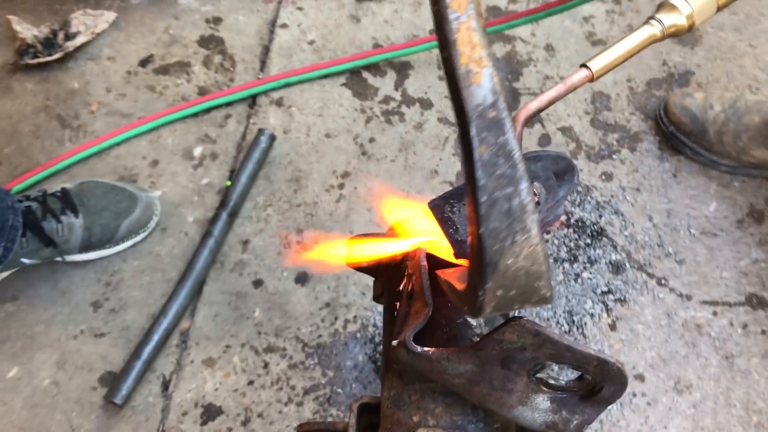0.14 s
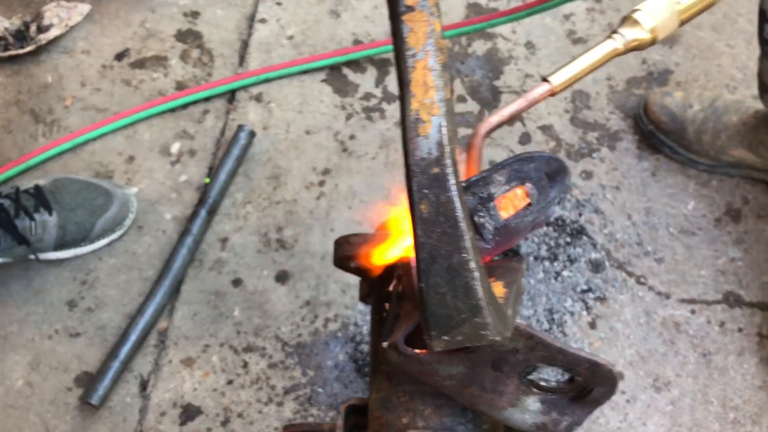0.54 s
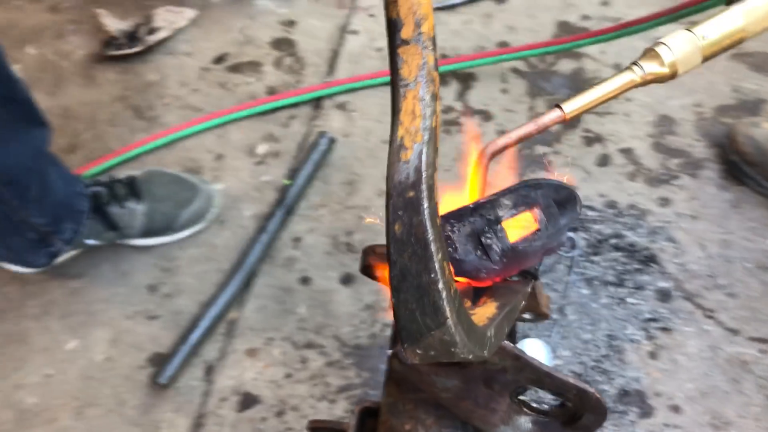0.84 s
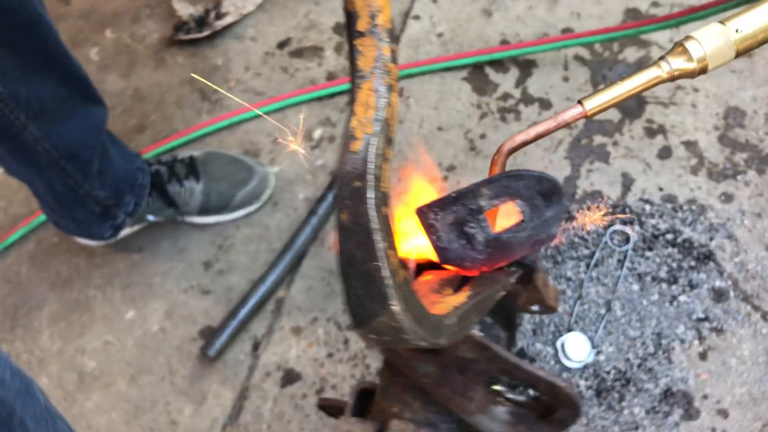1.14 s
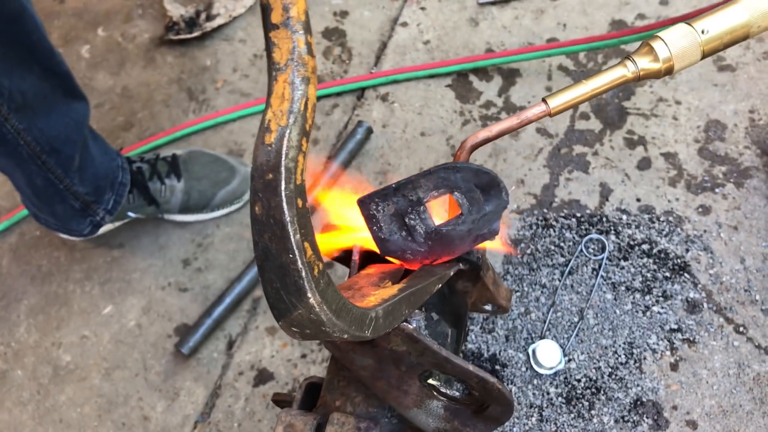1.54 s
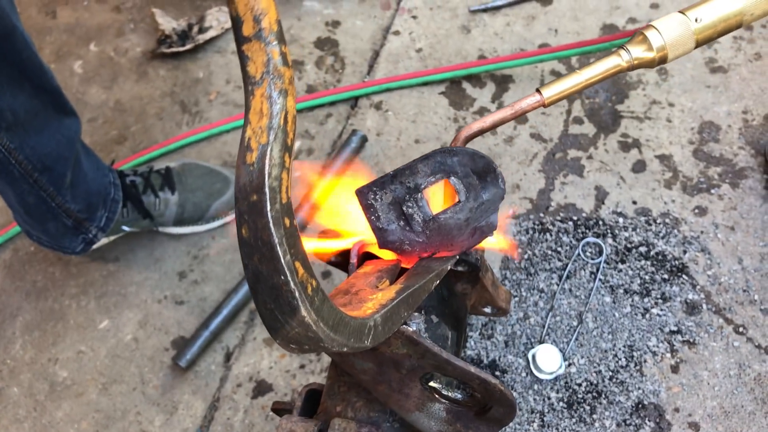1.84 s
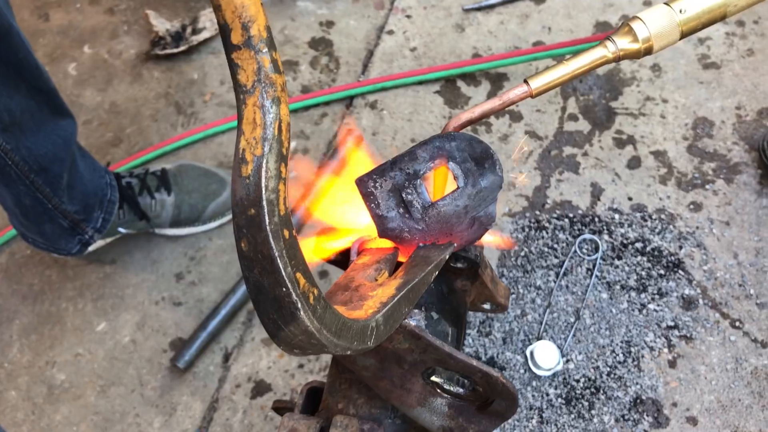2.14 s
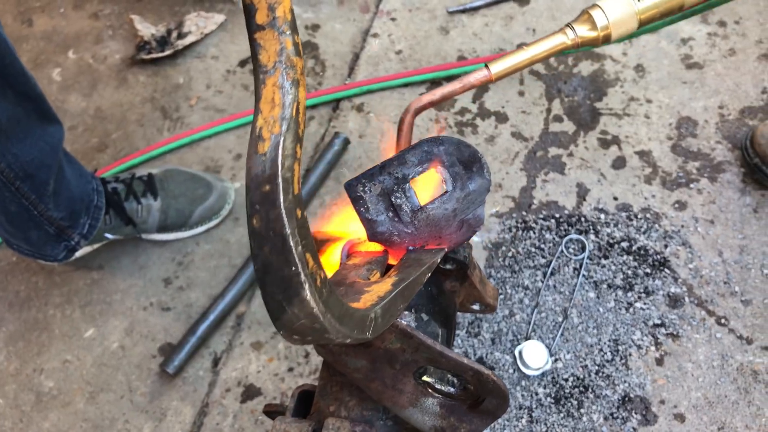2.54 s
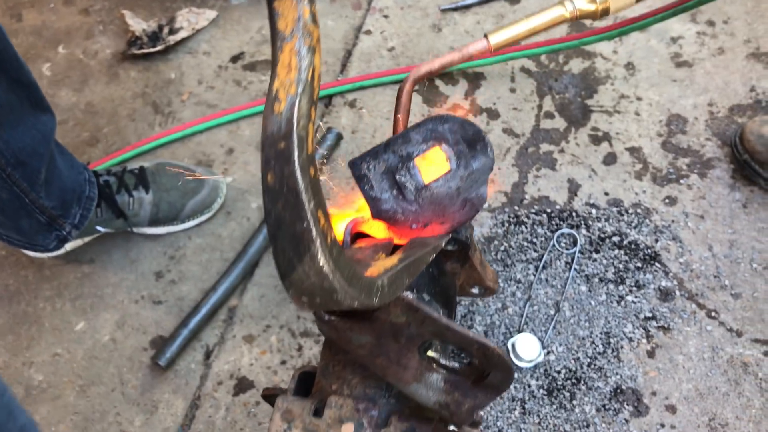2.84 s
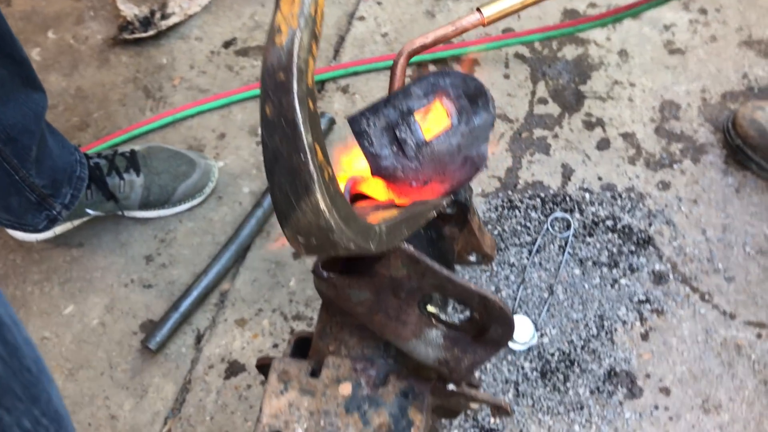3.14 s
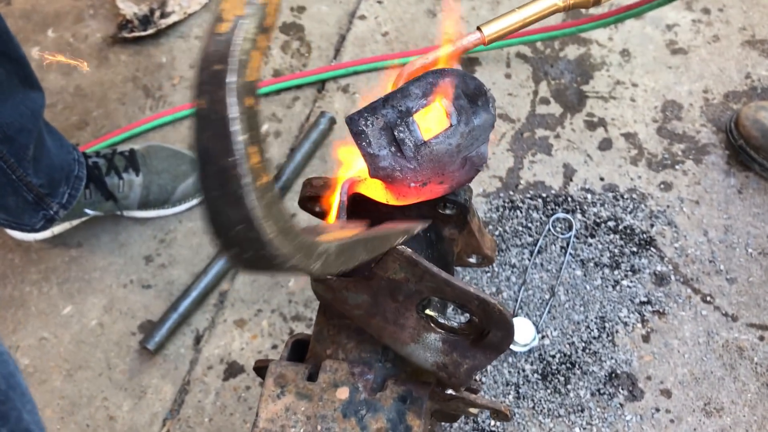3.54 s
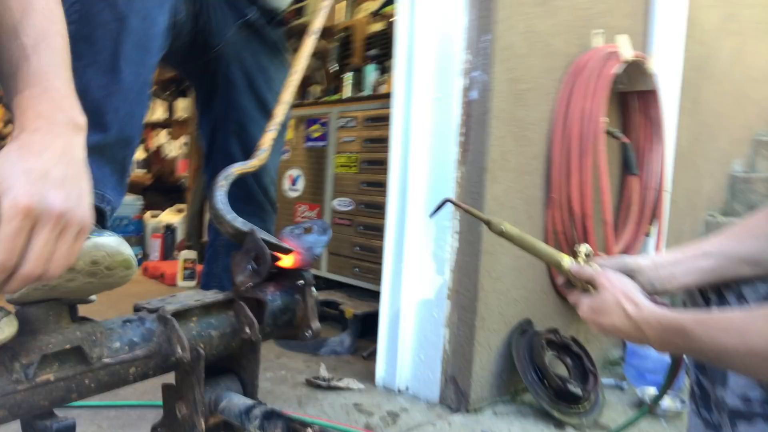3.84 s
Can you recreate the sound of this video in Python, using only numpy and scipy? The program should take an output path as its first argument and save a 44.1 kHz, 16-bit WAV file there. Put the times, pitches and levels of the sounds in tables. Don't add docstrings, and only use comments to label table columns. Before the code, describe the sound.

A gas torch starts with a soft burn and flutter, then hisses sharply on steel at close range, wavering and puffing; near the end a bar knocks a vice three times, then abrupt quiet.

```python
import sys
import numpy as np
from scipy import signal
from scipy.fft import rfft, irfft
from scipy.io import wavfile
from scipy.ndimage import uniform_filter1d, map_coordinates

SR = 44100
rng = np.random.default_rng(int(sys.argv[2]) if len(sys.argv) > 2 else 0)


def field_ratio(decibels):
    return 10 ** (np.asarray(decibels, dtype=float) / 20)


def put_to_file(sound):
    columns = np.atleast_2d(sound).T
    safe = np.clip(columns, -1, 1)
    whole_steps = np.round(safe * 32767)
    wavfile.write(sys.argv[1], SR, whole_steps.astype(np.int16))


N = 176400
T = np.arange(N) / SR
HZ = np.maximum(np.arange(N // 2 + 1) * SR / N, 1)

# f/Hz, level/dB
BURN_COLOUR = [(30, 1), (90, -2.5), (300, -11), (830, -15.5), (910, -0.5), (1500, -1), (2100, -6),
               (6000, -16), (9000, -42.5)]
# t/s, level/dB
ROAR_LEVEL = [(0, -54), (.05, -38.5), (.14, -42), (.19, -57), (.6, -59.5), (.65, -44), (.79, -36.5),
              (.87, -54), (1.6, -54.5), (1.64, -43), (1.83, -44.5), (1.91, -64.5), (2.1, -61.5),
              (2.17, -46.5), (2.3, -56), (2.7, -41.5), (3.22, -40.5), (3.35, -55)]
# f/Hz, level/dB
ROAR_TONE = [(30, -14), (80, -6), (250, 0), (700, -2.5), (1200, 0), (1550, -5), (1800, -7), (6000, -31.5)]
# t/s, peak level/dB, f/Hz
GAS_PUFFS = [
    (.11, -35, 330),
    (1.226, -39, 550),
    (1.395, -33.5, 310),
    (1.501, -39, 240),
    (3.437, -40, 400),
    (1.685, -36, 490),
    (1.81, -35, 200),
    (2.133, -39, 370),
    (2.166, -37, 390),
]
# t/s, level/dB
NOZZLE_LEVEL = [(0, -56), (.1, -54.5), (.17, -36), (.63, -40.5), (.86, -31.5), (1.01, -39.5), (1.1, -32.5),
                (1.27, -47), (1.38, -40), (1.46, -41), (1.7, -49), (1.87, -35), (2.0, -39.5), (2.3, -33.5),
                (2.47, -41), (2.9, -33), (3.22, -38.5), (3.9, -37.5)]
# f/Hz, level/dB
NOZZLE_TONE = [(4000, -30), (7000, 2.5), (10500, 2), (11300, 10), (13000, 10.5), (14500, 9), (16000, 4.5)]
# t/s, peak level/dB, decay/s
NOZZLE_SPITS = [(.7905, -24, .004), (.802, -32, .008), (.2, -38, .05), (.3, -38, .04), (.9, -36, .06),
                (.06, -46, .06), (1.9, -38, .05), (1.7, -40, .04), (2.13, -34, .06), (2.37, -35, .02),
                (2.59, -34, .03), (2.7, -36, .05), (3.09, -35, .03), (1.05, -36, .03), (1.44, -30, .04),
                (1.56, -35, .05), (1.81, -35, .04), (3.34, -35, .02), (3.42, -34, .02), (3.64, -30, .03),
                (3.74, -35, .02)]
# t/s, level/dB, brightness/(dB per octave), ring of the hole/dB
JET_PATH = [(0, -53.5, 2.5, -15), (.13, -47, -5.5, -9.5), (.18, -33, -2, -2.5), (.6, -32.5, -2, -12.5),
            (.65, -45.5, -7.5, -10), (.88, -33, -1.5, -4), (1.17, -37, -2, -10), (1.26, -43, -5, -7),
            (1.39, -47, -7.5, -6), (1.45, -36, -0.5, -16), (1.65, -44.5, -4, -10), (1.78, -40, -1.5, -3.5),
            (1.9, -30.5, 0.5, -4.5), (2.2, -31, 0.5, 0.5), (2.35, -34, 0.5, -7), (2.95, -29.5, -1.5, -5),
            (3.43, -38, -5.5, -4), (3.75, -33, -1, -9)]
# f/Hz, level/dB
JET_TONE = [(900, -25.5), (1900, -12), (3500, -3.5), (5800, 0), (7700, -3), (9400, -5.5), (10500, -4.5),
            (17000, -23)]
# f/Hz, level/dB
HOLE_TONE = [(6500, -29), (7900, -1.5), (8800, 5.5), (9600, 4.5), (10300, -9), (11000, -25)]
# middle t/s, length/s, then changes of jet/dB, ring of the hole/dB, roar/dB
HAND_WAVERS = [(0.05, 0.057, 3.5, -3, 1), (0.493, 0.28, 0.5, -11, -1), (0.71, 0.21, -0.5, 8, -0.5),
               (1.012, .1, -2.5, 0, 2), (1.296, 0.25, -3, -2, 3), (1.457, 0.16, 1.5, -3, 7),
               (1.87, 0.14, 1, -7, 0), (2.152, 0.39, 2, -2, 0.5), (2.47, 0.23, 0.5, -7, 4.5),
               (2.576, 0.18, 2, -1.5, 1), (2.765, 0.16, -1.4, 8, 2), (2.95, 0.41, -0.5, 0.5, 3),
               (3.155, 0.1, 2.5, 3, 0.5), (3.31, 0.21, 1.5, -5.5, -2), (3.492, .2, -5, 4, 2),
               (3.619, 0.12, 0.5, 10, -4), (3.773, 0.11, 0.5, 8, -4), (3.86, 0.2, 2, -10, -3)]
# f/Hz, level/dB
FLOOR_ECHO = [(1350, 0), (1490, 2), (1545, -5), (1780, -5.5), (1900, -1), (1985, -7), (2040, 0)]
# middle t/s, length/s, level/dB, f/Hz
FLAME_THRUMS = [
    (1.075, 0.19, -54, 75),
    (1.408, 0.088, -52.5, 70),
    (2.294, 0.42, -55.5, 85),
    (3.54, 0.32, -54, 90),
    (3.423, .07, -52.5, 139.7),
    (3.678, 0.06, -45.5, 110),
    (3.83, 0.11, -48, 120),
]
# t/s, peak level/dB, crack level/dB
BAR_KNOCKS = [
    [(3.4715, -18.5, -12), (3.476, -24, -6)],
    [(3.502, -25.5, -11), (3.508, -32, -9), (3.518, -30, -6), (3.532, -35, -11)],
    [(3.651, -14.5, -5), (3.6586, -18, -8), (3.675, -27, -6)],
    [(3.7995, -14.5, -8), (3.832, -21, -6), (3.861, -30, -14), (3.898, -27.5, -9)],
    [(3.803, -21.5, -6), (3.8085, -24.5, -7), (3.842, -34, -4), (3.872, -28, -10)],
]
# f/Hz, time to fall 60 dB/s, level/dB at each of five contact points
METAL_MODES = [(261, 0.042, -34, -1, -4.5, -20, -17), (354, 0.092, -30, -22, -9.5, -31, -25),
               (510, 0.13, -23, -12, -15.5, -20, -9), (693, .05, -28, -12, -1.5, -28, -25),
               (774, 0.021, -27, -12, 2, -27, -17), (904, 0.12, -22, -8, -2, -12, -1.5),
               (1255, 0.025, -25, -17, -3.5, 2, -4), (1490, 0.12, -19, -23, -8, -18, -12),
               (1617, 0.053, -22, -12, 0.5, -25, -22), (2104, .12, -8, -3, -11, -10, -12),
               (2440, 0.022, -11, -16, -13, 2.5, -14), (2780, .08, -12, -16, -15.5, -7, -8),
               (1117, 0.047, 0.5, 4, -10, -4, -11), (1805, 0.5, -28, -12.5, -23, -37, -28),
             (3285, 0.12, -2, -8, -14, -14, 1.5), (5556, .07, -7, -20, -30, -25, -20),
             (6170, .045, -7, -25, -30, -11, -7), (6500, 0.062, -3, -25, -30, -12, -10)]
# middle t/s, length/s, level/dB
BAR_SCRAPES = [
    (3.53, 0.074, -43),
    (3.863, 0.09, -42),
]
# f/Hz, level/dB
CRACK_TONE = [(250, -3.5), (900, 3.5), (3500, 7.5), (8000, -16)]
DRAG_TONE = [(120, -3), (280, 0.5), (1200, 0.5), (2500, -17)]
# f/Hz, level/dB
YARD_TONE = [(24, -28), (40, 7), (965, -12), (1150, -11), (1520, -4.5), (2380, -22.5), (5440, -27),
             (13100, -34), (16000, -36)]
# middle t/s, low f/Hz, high f/Hz
SIDE_PATCHES = [(.28, 12300, 14500), (.40, 4200, 5300), (.40, 7500, 9100), (.41, 11700, 14000),
                (.42, 5600, 7000), (.49, 8900, 11100), (2.0, 5100, 6400), (2.625, 4200, 5300),
                (2.625, 6800, 8400), (3.045, 7500, 9100), (3.045, 9600, 11200), (3.045, 13000, 15700)]
BASS, TREBLE, TOP = (4.5, 13.2), (9.5, 14.4), (11.83, 14.4)


def unit(x):
    return x / np.sqrt(np.mean(x ** 2))


def curve(rows, col=1):
    rows = np.array(rows, float)
    return np.interp(T, rows[:, 0], rows[:, col])


def colour(x, points):
    hz, db = np.array(points, float).T
    return rfft(x) * field_ratio(np.interp(np.log(HZ), np.log(hz), db))


def coloured_noise(points):
    return unit(irfft(colour(rng.standard_normal(N), points), N))


def swell_shape(middle_s, length_s):
    return np.cos(np.pi / 2 * np.clip(2 * (T - middle_s) / length_s, -1, 1))


def high_pass(x, order, hz):
    return signal.sosfilt(signal.butter(N=order, Wn=hz, btype="high", fs=SR, output="sos"), x)


def hand_waver(col):
    total_db = 0
    for row in HAND_WAVERS:
        away = 2 * (T - row[0]) / row[1]
        total_db = total_db + row[col] * np.maximum(1 - away ** 2, 0) ** 2
    return total_db


def walk(rate):
    k = 16
    x = np.repeat(rng.standard_normal(int(N / SR * rate) + 3), k)
    x = unit(uniform_filter1d(uniform_filter1d(x, k), k))
    return np.interp(T * rate * k, np.arange(len(x)), x)


def turbulence(points, eddy_db, eddy_rate, gust_db, flicker_db, tilt_db=0, octaves=BASS):
    eddies = rng.standard_normal(N) * field_ratio(eddy_db * walk(eddy_rate))
    spec = colour(eddies, points)
    pitch = np.log2(HZ)
    gust, flicker, out = walk(9.09), walk(5.9), 0
    for centre in np.arange(*octaves, 1 / 3):
        flicker = 0.85 * flicker + 0.91 * walk(6.18)
        band = irfft(spec * np.clip(1 - 3 * abs(pitch - centre), 0, 1), N)
        tilt = tilt_db * (centre - np.log2(6000))
        out = out + band * field_ratio(gust_db * gust + flicker_db * flicker + tilt)
    return out / np.sqrt(np.mean(irfft(spec, N) ** 2))


def steady_burn():
    return turbulence(BURN_COLOUR, 2.1, 200, 0.87, 0.74, octaves=BASS) * field_ratio(-48)


def flame_roar():
    roar = turbulence(ROAR_TONE, 1.95, 70, 0.75, 0.53, octaves=BASS)
    return roar * field_ratio(curve(ROAR_LEVEL) + hand_waver(col=4) + 3.5)


def gas_puffs():
    out, rasp = 0, coloured_noise(ROAR_TONE)
    for start, db, hz in GAS_PUFFS:
        age = np.maximum(T - start, 0)
        fade = np.exp(-age / 0.0052) * (T > start)
        out = out + field_ratio(db) * fade * (np.sin(2 * np.pi * hz * age) + 0.85 * rasp)
    return out


def nozzle_sizzle():
    level = field_ratio(curve(NOZZLE_LEVEL) + 0.5)
    for peak, db, length in NOZZLE_SPITS:
        rise = np.clip((T - peak) / (0.64 * length) + 1, 0, 1)
        level = level + field_ratio(db) * rise * np.exp(-np.maximum(T - peak, 0) / length)
    return turbulence(NOZZLE_TONE, 2.0, 1500, 0.94, 1.4, octaves=TOP) * level


def jet_hiss(jet_db):
    brightness = curve(JET_PATH, col=2)
    return turbulence(JET_TONE, 1.36, 1500, 0.94, 0.69, brightness, octaves=TREBLE) * field_ratio(jet_db + 2.0)


def hole_ring(jet_db):
    ring_db = curve(JET_PATH, col=3) + hand_waver(col=3)
    return turbulence(HOLE_TONE, 4.1, 1500, 0.75, 0.86, octaves=TOP) * field_ratio(jet_db + ring_db)


def torch():
    jet_db = curve(JET_PATH) + hand_waver(col=2)
    return jet_hiss(jet_db) + hole_ring(jet_db) + nozzle_sizzle() + flame_roar() + steady_burn()


def close_echoes(x):
    age = np.arange(2000) / SR
    cloud = rng.standard_normal(len(age)) * np.exp(-age / 0.012)
    bright = high_pass(x, 2, 2600)
    cloud = signal.fftconvolve(bright, cloud / np.sqrt(np.sum(cloud ** 2)))[:N]
    delay_s = 0.001085 + 0.000305 * walk(3)
    moving = map_coordinates(bright, [(T - delay_s) * SR], mode="mirror")
    block_ring = field_ratio(3.5 * np.exp(-((HZ - 2486) / 16.7) ** 2))
    mix = x + field_ratio(-6) * cloud + field_ratio(-17) * moving
    return 0.91 * irfft(colour(mix, FLOOR_ECHO) * block_ring, N)


def thrums():
    drift = np.cumsum(walk(14)) / SR
    swell, out = field_ratio(4.6 * walk(44.7)), 0
    for middle, length, db, hz in FLAME_THRUMS:
        tone = np.sin(2 * np.pi * hz * (T + 0.069 * drift))
        out = out + field_ratio(db) * swell * swell_shape(middle, length) * tone
    return out


def metal_ring(point, age):
    ring = 0
    for k, mode in enumerate(METAL_MODES):
        fade = np.exp(-np.log(1000) * age / mode[1])
        ring = ring + (-1) ** k * field_ratio(mode[2 + point]) * fade * np.sin(2 * np.pi * mode[0] * age)
    return ring


def knocks():
    out, age = np.zeros(N), T[:SR // 4]
    grit = coloured_noise(CRACK_TONE)
    for point, hits in enumerate(BAR_KNOCKS):
        ring = metal_ring(point, age)
        for start, db, crack_db in hits:
            i = int(start * SR)
            n = min(len(age), N - i)
            crack_fade = field_ratio(crack_db) * np.exp(-age / 0.004) + field_ratio(-15) * np.exp(-age / 0.046)
            out[i:i + n] += field_ratio(db - 10) * (ring[:n] + grit[i:i + n] * crack_fade[:n])
    return out


def bar_drag():
    level = sum(field_ratio(db) * swell_shape(middle, length) for middle, length, db in BAR_SCRAPES)
    return coloured_noise(DRAG_TONE) * level


def yard():
    tick_s = 3.966
    age = np.maximum(T - tick_s, 0)
    tick = unit(np.diff(rng.standard_normal(N + 1))) * np.exp(-age / 0.0037) * (T > tick_s)
    return coloured_noise(YARD_TONE) * field_ratio(-63) + field_ratio(-60) * tick


def scene():
    near = close_echoes(torch() + gas_puffs()) + knocks() + bar_drag() + thrums()
    near = high_pass(near, 3, 55)
    cut_s = 3.9012
    after = T > cut_s
    fade_db = -14 - 1700 * (T - cut_s)
    gate = field_ratio(after * fade_db) * (T < cut_s + 0.0105)
    return np.tile(near * gate + after * yard(), (2, 1))


def band_limit(x):
    return signal.sosfilt(signal.butter(12, 16600, fs=SR, output="sos"), x)


def record(dry):
    noise, side = rfft(rng.standard_normal(N)), 0
    for middle, low_hz, high_hz in SIDE_PATCHES:
        patch = unit(irfft(noise * (HZ > low_hz) * (HZ < high_hz), N))
        side = side + patch * swell_shape(middle, 0.048) ** 2
    side = side * field_ratio(curve(JET_PATH) - 8.5)
    both_ears = dry + side * np.array([[1], [-1]])
    wet = irfft(rfft(both_ears) * (HZ < 15730), N)
    return band_limit(wet)


dry = scene()
out = record(dry)
put_to_file(out)
```